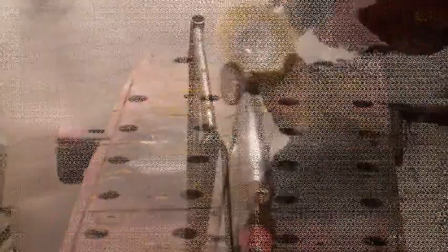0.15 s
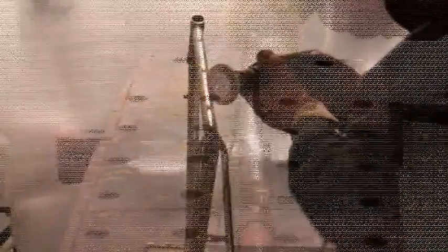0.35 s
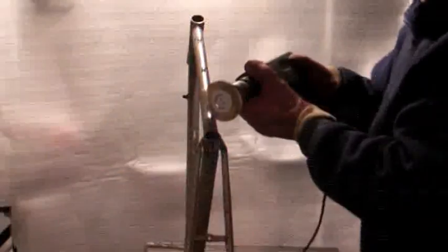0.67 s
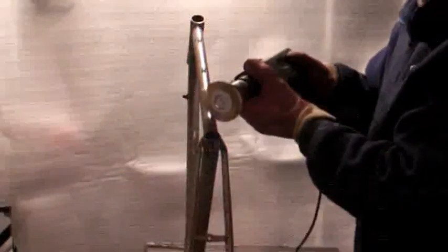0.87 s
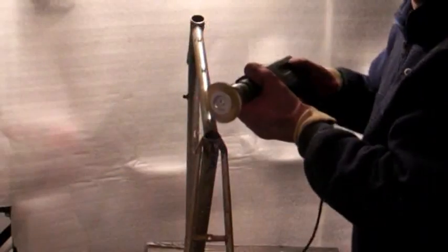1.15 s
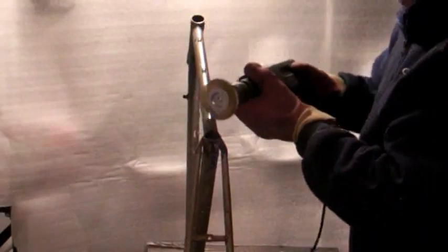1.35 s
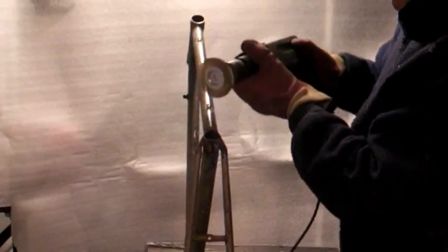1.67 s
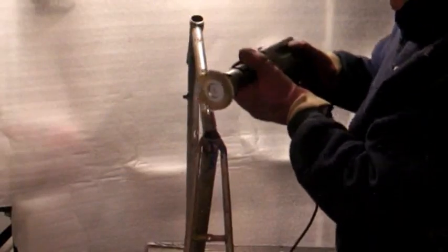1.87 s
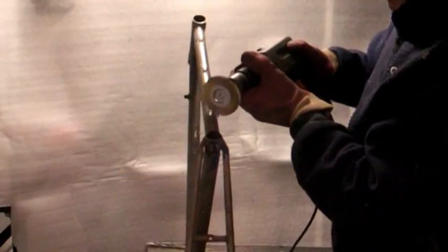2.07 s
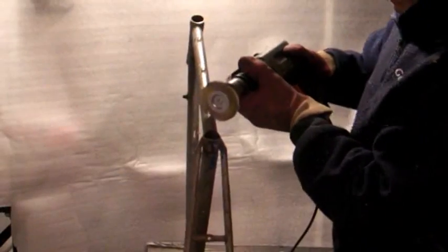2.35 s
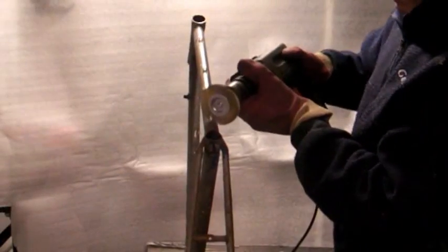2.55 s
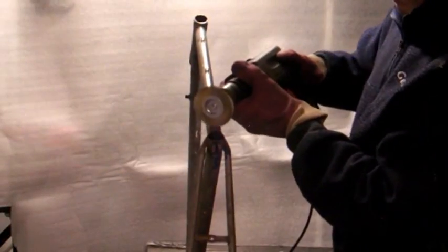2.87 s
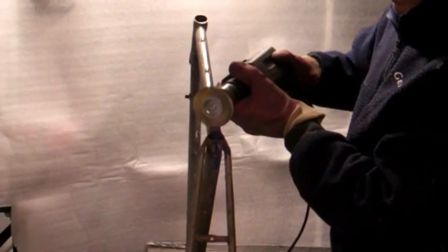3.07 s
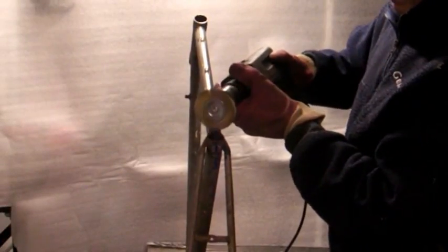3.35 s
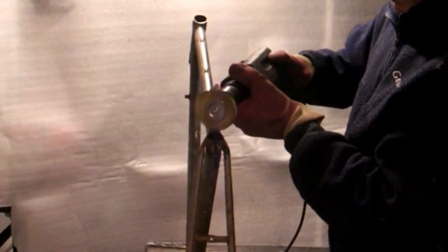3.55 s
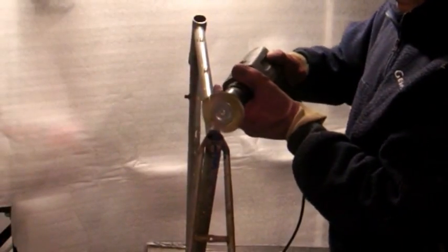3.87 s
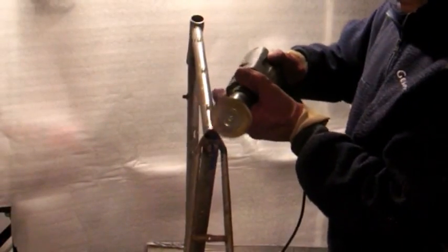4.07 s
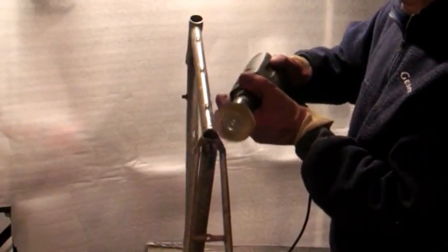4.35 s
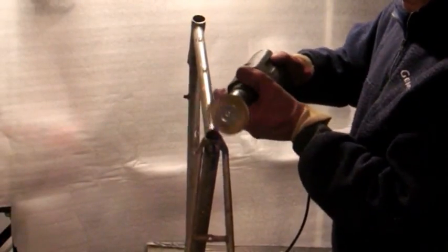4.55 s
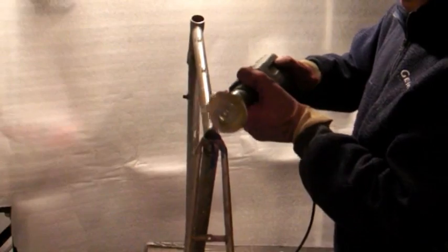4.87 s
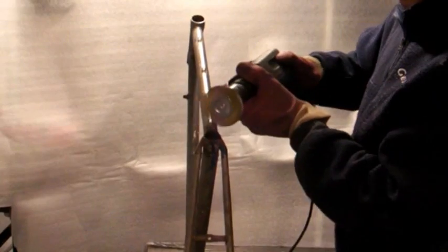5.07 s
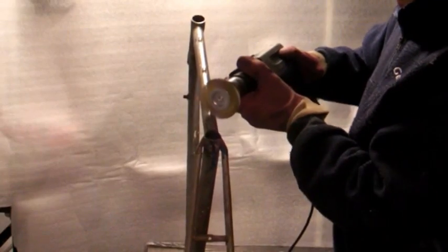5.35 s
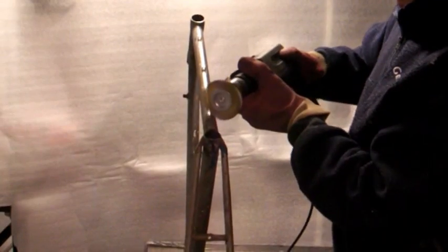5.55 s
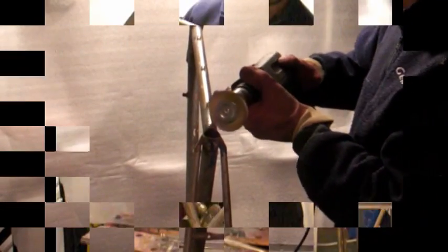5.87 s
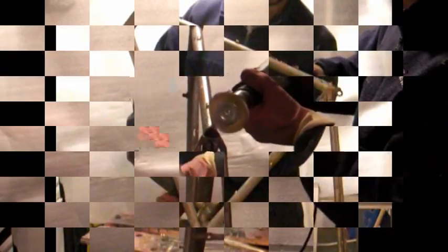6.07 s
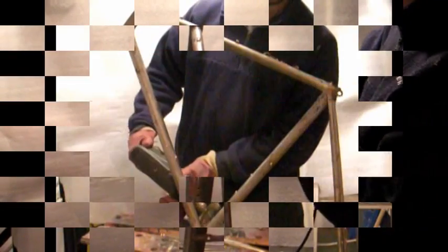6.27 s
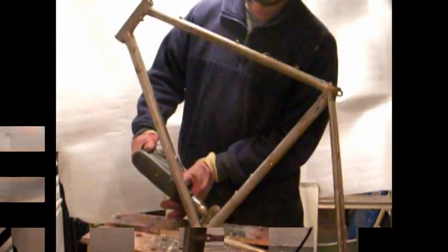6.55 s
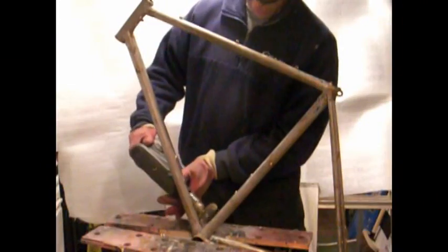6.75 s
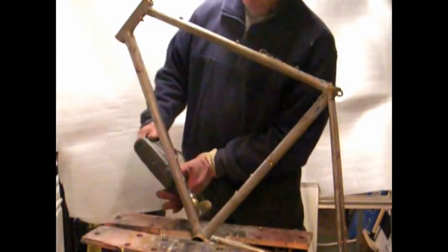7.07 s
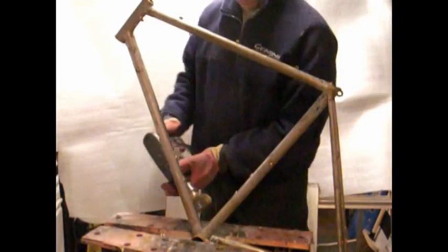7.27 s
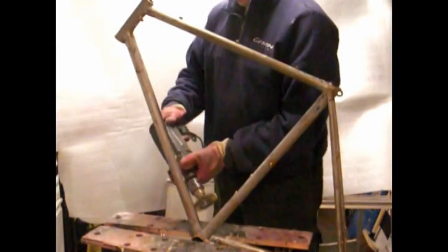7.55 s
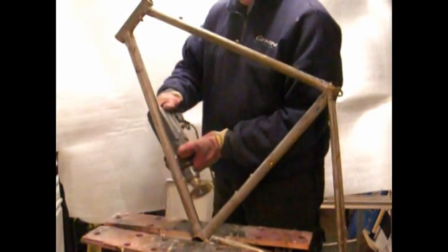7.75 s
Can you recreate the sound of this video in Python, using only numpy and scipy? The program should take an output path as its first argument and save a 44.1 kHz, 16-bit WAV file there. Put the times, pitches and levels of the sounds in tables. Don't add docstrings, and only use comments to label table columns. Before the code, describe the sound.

Harsh, bright, dense wire scratching runs almost throughout, with an electric drill's gear whine and faint chuck throb beneath. The first stretch fades within a second; the second jumps in, sags in pitch under pressure and partly recovers; the third blends in near the end. Steel tubes sing at fixed high pitches. Two close microphone ports in a garage hear each side differently.

```python
import sys
import numpy as np
from scipy import signal
from scipy.fft import rfft, irfft, next_fast_len
from scipy.io import wavfile
from scipy.ndimage import uniform_filter1d

SR = 44100
rng = np.random.default_rng(int(sys.argv[2]) if len(sys.argv) > 2 else 0)


def wav_out(sig):
    wavfile.write(sys.argv[1], SR, np.round(np.clip(np.atleast_2d(sig).T, -1, 1) * 32767).astype(np.int16))


def field_ratio(decibels):
    return 10 ** (np.asarray(decibels, dtype=float) / 20)


N = 348831
T = np.arange(N) / SR
CUT_S, BLEND_START_S, HANDOVER_S = 0.667, 5.64, 6.11
FADE_S = 1

RUMBLE_DB, BOOM_DB, ROAR_DB = [7, 5, -3], [1, 1.5, 0], [8, 1, 11]
RATTLE_DB = [0.8, 1.6, 2]
SHEEN_DB = [-0.5, 1.5, 2]
GROWL_DB = [0.5, 2, 3.5]
LOAD_COLOUR_DB = [-0.5, -3, -0.5, -1.5, -0.4, -5.5]
# centre_s, width_s, boom_db, roar_db, rattle_db
TUBE_SPOTS = [
    (0.75, 0.12, 6, 1, 0.1),
    (1.62, 0.13, 12.5, 2, 0.1),
    (2.3, 0.25, 2, -1.5, 0.47),
    (3.3, 0.13, -2, -1, 0.1),
    (4.3, 0.28, 3, 2, 0.38),
    (5.4, 0.19, 0.1, 0.5, 2.5),
    (6.85, 0.35, -4, 1, 0.1),
    (7.6, 0.24, -6.5, -5.5, 0.1),
]
# pitch_hz, level_db
RASP_SPECTRUM = [(25, -44), (130, -25), (300, -13.5), (350, -8), (480, -7), (750, 0), (2400, -1),
                 (3000, 0.1), (4200, -2.5), (6000, -0.5), (8000, 1.5), (9000, 2), (11000, 0), (15800, -1.5)]


def wires(rasp_db):
    frames, hz = N // 256 + 5, np.fft.rfftfreq(1024, 1 / SR)
    t = np.arange(frames) * 256 / SR
    colour_db = rasp_colour(hz, t)
    a, b, c, d, patches = rng.standard_normal((frames, 513, 5)).T
    patches = uniform_filter1d(patches, 10, axis=0)
    patches = evened(uniform_filter1d(patches, 16, axis=1))

    same = np.clip(read(PORT_LIKENESS, hz), 0, 1)[:, None]
    left, own = a + 1j * b, c + 1j * d
    right = same * np.exp(-1j * read(PORT_LEAD, hz))[:, None] * left + np.sqrt(1 - same ** 2) * own
    half = field_ratio(read(PORT_BALANCE, hz) / 2)[:, None]
    spectrum = np.array([left * half, right / half])
    spectrum *= field_ratio(read(RASP_SPECTRUM, hz)[:, None] + 0.63 * patches + colour_db)
    noise = signal.istft(spectrum, nperseg=1024, noverlap=768)[1][:, :N]
    scratch = evened(frame(noise))

    catches = (rng.random(N) < 400 / SR) * rng.random(N)
    bites = signal.lfilter([1], [1, -np.exp(-1 / (0.0025 * SR))], catches)
    return field_ratio(rasp_db + 0.5 * drift(3.0).real) * (1 + 0.15 * bites) * scratch


def rasp_colour(hz, t):
    free_speed = 455
    load = 10 * by_stretch([0, 1, 1], t) * (1 - shaft_speeds(t)[1] / free_speed)
    own_colours = (RUMBLE_DB, BOOM_DB, ROAR_DB, RATTLE_DB, SHEEN_DB, GROWL_DB)
    levels = [by_stretch(own, t) + slope * load for own, slope in zip(own_colours, LOAD_COLOUR_DB)]
    rumble, boom, roar, rattle, sheen, growl = levels
    spots = sum(np.outer(db, np.exp(-((t - s) / width) ** 2)) for s, width, *db in TUBE_SPOTS)
    boom, roar, rattle = [boom, roar, rattle] + spots
    growl = growl + spots[1]
    # (Hz, share)
    bands = [([(240, 0.47), (380, 0)], rumble),
             ([(240, 0.1), (400, 0.75), (500, 0.73), (600, 0.22)], boom),
             ([(500, 0.25), (600, 0.55), (1100, 0.0), (2000, 0)], roar),
             ([(2600, 0.0041), (3600, 0.78), (5000, 1), (7000, 0)], rattle),
             ([(8200, 0), (9000, 1), (9900, 0.46)], sheen),
             ([(750, 0.098), (1000, 0.74), (1400, 0)], growl),
             ([(1100, 0.083), (1280, 1.3), (1450, 0.62), (2300, 0), (3100, 0.94), (3900, 0.25)], 0.66 * load)]
    return sum(np.outer(read(band, hz), db) for band, db in bands)


# pitch_hz, lift_db
FRAME_MODES = [(625, 0.5), (715, -2), (860, -2.5), (920, 2.5), (1020, -7), (1163, 1), (1290, 0.5),
               (1364, 1.5), (1461, 2.5), (1530, -7), (1630, 3.5), (1905, 2.5), (2240, 4)]


def frame(x, width_hz=16):
    size = next_fast_len(N)
    hz = np.fft.rfftfreq(size, 1 / SR)
    lift_db = sum(db / (1 + ((hz - f) / width_hz) ** 2) for f, db in FRAME_MODES)
    ragged = evened(uniform_filter1d(rng.standard_normal(len(hz)), 140))
    lift_db += 2.7 * ragged * read([(2000, 1.0), (5000, 0.94)], hz)
    return irfft(rfft(x, size) * field_ratio(lift_db), size)[:, :N]


RASP_DB = [-12.5, -15, -13.5]
# time_s, change_db
STROKE_TURNS = [(0.9, 0), (1.2, 0.5), (1.4, -0.5), (1.74, 3.5), (1.83, -1), (2.07, -0.5), (2.3, 0.5),
                (4.03, 1), (4.53, -2), (4.75, -2.5), (5.0, -2), (5.23, -1.2), (6.93, 1), (7.17, -1.8),
                (7.35, -1.5)]


def rasp_level():
    turn_s = 0.023
    return by_stretch(RASP_DB) + sum(db * np.exp(-((T - s) / turn_s) ** 2) for s, db in STROKE_TURNS)


# start_s, length_s, level_db
PRESSES = [(-0.1, 0.31, -22.5), (0.2, 0.087, -27), (0.3, 0.37, -30), (1.72, 0.054, -29), (1.85, 0.068, -40),
           (2.08, 0.28, -40), (2.35, 0.14, -26), (2.56, 0.18, -20.5), (2.8, 0.13, -17), (2.93, 0.36, -15),
           (3.34, 0.29, -19.5), (3.64, 0.17, -26), (3.84, 0.16, -22), (4.04, 0.21, -17.5), (4.3, 0.11, -23),
           (4.44, 0.11, -19), (4.57, 0.25, -22.5), (4.84, 0.15, -20.5), (5.03, 0.34, -24),
           (5.42, 0.38, -22), (5.8, 0.21, -24), (6.03, 0.4, -28), (6.44, 0.26, -21.5), (6.72, 0.4, -26),
           (7.18, 0.22, -33), (7.4, 0.21, -25.5), (7.62, 0.4, -29.5)]
HOUSING_SWELLS = {"first": [(0.7, 1.63, -50), (2.3, 0.62, -48), (3.33, 0.67, -43), (4.22, 1.9, -43.5)],
                  "second": [(3.3, 1.56, -48), (7.4, 0.25, -35.5)], "third": [(0.9, 0.8, -46),
                  (2.22, 0.48, -34), (3.3, 0.82, -35), (4.25, 0.3, -40), (4.6, 1.2, -36),
                  (6.22, 1.13, -33.5), (7.45, 0.6, -42)], "fifth": [(-0.1, 0.42, -33.5), (2.2, 0.44, -36),
                  (2.8, 0.42, -38), (3.38, 0.22, -28), (3.75, 0.36, -32), (5.33, 0.24, -33),
                  (6.15, 0.75, -36), (7.42, 0.6, -34)], "eighth": [(2.3, 0.42, -43), (2.72, 0.24, -31),
                  (3.2, 0.8, -35), (4.07, 0.35, -31), (4.5, 0.2, -35), (5.2, 0.4, -44), (5.8, 0.3, -44),
                  (6.8, 0.17, -41), (7.25, 0.21, -37), (7.75, 0.3, -33)]}
HOUSING_REST_DB = {"first": -47.5, "second": -60, "third": -42, "fifth": -45.5, "eighth": -45}
CHUCK_SWELLS = {"lower": [(-0.1, 0.4, -37), (2.4, 0.41, -33), (3.25, 0.14, -38), (3.7, 0.34, -33),
                (4.3, 0.27, -36), (4.85, 1.28, -34.5), (5.02, 0.27, -33), (6.6, 0.5, -43)],
                "upper": [(-0.1, 0.48, -32), (2.6, 0.3, -40), (3.23, 0.2, -29), (3.65, 0.4, -34),
                (5.0, 0.37, -43)], "second": [(-0.1, 0.75, -45), (2.2, 0.6, -72), (3.6, 2.85, -64.5)],
                "third": [(2.4, 0.43, -65), (4.05, 0.46, -55), (4.7, 1.5, -64)],
                "fourth": [(-0.1, 0.88, -51.5), (6.15, 0.58, -58), (7.0, 0.35, -55.5)],
                "sixth": [(2.4, 1.03, -58.5), (4.0, 1.4, -64), (6.3, 0.85, -50), (7.2, 0.56, -53),
                (7.75, 0.3, -45)]}
BELOW_DB = [-12, -9, -6]
# start_s, length_s, level_db
WHISTLE = [
    (3.31, 0.7, -25),
    (3.65, 0.2, -26),
]


def drill():
    turns = np.cumsum(shaft_speeds()[1]) / SR
    chuck = 1 / 9.72
    edge_s, sideband_rest_db, throb_rest_db = 0.14, -54, -76.5
    whine = swells(PRESSES, -42, 0.11)
    o1, o2, o3, o5, o8 = [swells(rows, HOUSING_REST_DB[name], edge_s) for name, rows in HOUSING_SWELLS.items()]
    lower, upper = [swells(CHUCK_SWELLS[name], sideband_rest_db, edge_s) for name in ("lower", "upper")]
    lines = [(4, whine), (1, o1), (2, o2), (3, o3), (5, o5), (8, o8)]
    lines += [(4 - chuck, lower), (4 + chuck, upper)]
    lines += zip((12, 3 + chuck, 4 + 2 * chuck), np.add([o8, o3, upper], np.c_[BELOW_DB]))
    for multiple, name in [(2, "second"), (3, "third"), (4, "fourth"), (6, "sixth")]:
        lines.append((multiple * chuck, swells(CHUCK_SWELLS[name], throb_rest_db, edge_s)))
    lines.append((40, swells(WHISTLE, -70, edge_s)))
    out = np.zeros((2, N))
    for order, db in lines:
        waver = 1 + min(0.03 * order, 0.6) * drift(16 + order)
        tone = field_ratio(db) * waver * np.exp(2j * np.pi * (order * turns + rng.random()))
        out += ports(tone, order * 420, 6.0)
    return out


# time_s, speed_turns_per_s
SHAFT_SPEED = [
    [(0.0, 431.5), (0.66, 441.1)],
    [(0.68, 456.2), (2.15, 452.5), (2.87, 404.0), (3.28, 400.8), (3.485, 377.2), (3.72, 390.5),
     (4.0, 393.5), (4.4, 417.8), (4.85, 417.0), (5.4, 421.0), (6.1, 415.5)],
    [(6.11, 406.0), (6.4, 411.5), (6.68, 406.3), (7.4, 427.8), (7.76, 415.5)],
]


def shaft_speeds(t=T):
    size = round(0.12 / (t[1] - t[0]))
    smooth = []
    for rows in SHAFT_SPEED:
        time_s, speed = np.transpose(rows)
        smooth.append(uniform_filter1d(np.interp(t, time_s, speed), size))
    first, second, third = smooth
    return second, np.select([t < CUT_S, t < HANDOVER_S], [first, second], third)


def swells(rows, rest_db, edge_s):
    t = T[::64]
    start, length, db = np.transpose(rows)[:, :, None]
    inside_s = np.minimum(t - start, start + length - t)
    shape = np.sin(np.pi / 2 * np.clip(inside_s / edge_s + 0.5, 0, 1)) ** 2
    return np.interp(T, t, 20 * np.log10(field_ratio(rest_db) + (field_ratio(db) * shape).sum(0)))


# start_s, end_s, pitch_hz, level_db
TUBE_RINGS = [(0.0, 0.24, 9285.0, -33.0), (0.0, 0.44, 10729.0, -33.0), (0.0, 0.48, 12163.0, -36.0),
              (1.02, 1.26, 11507.0, -35.0), (1.69, 2.01, 9517.0, -30.0), (1.71, 1.96, 10999.0, -36.0),
              (2.02, 2.67, 11015.0, -28.0), (2.11, 2.61, 11534.0, -32.0), (2.16, 2.4, 14199.0, -34.0),
              (2.21, 2.85, 5273.0, -33.0), (2.49, 2.89, 9507.0, -35.0), (2.53, 3.22, 14201.0, -36.0),
              (2.99, 3.34, 12001.0, -36.0), (3.43, 3.73, 13232.0, -36.0), (3.66, 3.91, 8597.0, -30.0),
              (4.34, 4.63, 14196.0, -35.0), (4.67, 5.09, 14202.0, -33.0), (4.84, 5.28, 5275.0, -35.0),
              (4.85, 5.1, 9510.0, -34.0), (5.01, 5.34, 6089.0, -36.0), (5.03, 5.84, 11013.0, -30.0),
              (5.34, 5.79, 5277.0, -32.0), (5.6, 5.89, 11537.0, -32.0), (5.62, 5.89, 6097.0, -35.0),
              (6.52, 7.15, 13666.0, -36.0), (6.7, 6.97, 12381.0, -36.0), (6.99, 7.62, 8876.0, -31.0),
              (7.03, 7.91, 9074.0, -33.0), (7.2, 7.47, 9204.0, -32.0), (7.67, 7.91, 8500.0, -35.0)]
# pitch_hz, level_db
TUBE_HUMS = [(4610, -47), (5262, -45), (6090, -46), (7085, -47), (8880, -46), (9205, -45), (9510, -46),
             (11000, -45), (11530, -47), (13240, -48), (13660, -48), (14190, -44), (15065, -47)]


def tubes(rasp_db):
    out = np.zeros((2, N))
    for hz, db in TUBE_HUMS:
        swell = field_ratio(db + rasp_db - np.median(rasp_db) + 3.0 * drift(1.5).real)
        out += ports(swell * drift(16) * np.exp(2j * np.pi * hz * T), hz, 5.4)
    for start, end, hz, db in TUBE_RINGS:
        part = slice(max(round((start - 0.04) * SR), 0), min(round((end + 0.05) * SR), N))
        t = T[part]
        fuzz = 0.65 + 0.75 * drift(hz / 520, size=len(t))
        tone = fuzz * np.exp(2j * np.pi * hz * t) * signal.windows.tukey(len(t), 0.6)
        trim_db = read([(5500, 0.5), (9000, -0.6), (14200, 1.5)], hz)
        out[:, part] += ports(field_ratio(db + trim_db) * tone, hz, 12.0)
    return out


def lingering_whine():
    old_speed = shaft_speeds()[0]
    since = np.maximum(T - HANDOVER_S, 0)
    level = (since > 0) * (T < BLEND_START_S + FADE_S) * field_ratio(-27 - 16 * since)
    return ports(level * np.exp(2j * np.pi * 4 * np.cumsum(old_speed) / SR), 1660, 6.0)


def low_hum():
    return np.sqrt(2) * by_stretch([0, 0, 1]) * field_ratio(-68) * np.sin(2 * np.pi * 62 * T)


# pitch_hz, likeness (0 to 1)
PORT_LIKENESS = [(60, .76), (400, .86), (1500, .74), (2200, .38), (3800, .08), (5500, .26), (9000, .36),
                 (11700, .08), (14000, .33), (15700, .33)]
# pitch_hz, lead_rad
PORT_LEAD = [(100, 0), (1500, .17), (3300, .9), (5000, 2.3), (6000, 2.8), (9000, 3.2), (10800, 2.7),
             (12300, .2), (15000, 0)]
# pitch_hz, level_db
PORT_BALANCE = [(60, -3), (180, -4.5), (550, -3), (1650, -3), (4970, -0.5), (15000, -0.5)]


def ports(tone, hz, rate_hz):
    same = np.clip(read(PORT_LIKENESS, hz) + 0.22, 0, 0.98)
    lead = 0.45 * read(PORT_LEAD, hz)
    right = same * np.exp(-1j * lead) + np.sqrt(1 - same ** 2) * drift(rate_hz, size=len(tone))
    half = field_ratio(read(PORT_BALANCE, hz) / 2)
    return np.sqrt(2) * np.array([half * tone.real, (tone * right).real / half])


def evened(x):
    return x / np.sqrt(np.mean(abs(x) ** 2) + 1e-20)


def read(points, hz):
    f, value = np.transpose(points)
    return np.interp(np.log(hz + 1), np.log(f + 1), value)


def drift(rate_hz, size=N):
    steps = rng.standard_normal((size // 64 + 2, 2)) @ [1, 1j]
    hz = np.fft.fftfreq(len(steps), 64 / SR)
    slow = evened(np.fft.ifft(np.fft.fft(steps) / (1 + (hz / rate_hz) ** 2)))
    return np.interp(np.arange(size) / 64, np.arange(len(slow)), slow)


def by_stretch(values, t=T):
    first, second, third = values
    times = [CUT_S, CUT_S + 1e-3, BLEND_START_S, BLEND_START_S + FADE_S]
    return np.interp(t, times, [first, second, second, third])


def fader():
    blend = np.clip((T - BLEND_START_S) / FADE_S, 0, 1)
    first = np.maximum(CUT_S - T, 0) / FADE_S + 0.03
    later = np.clip((T - CUT_S) / 0.012, 0.01, 1)
    return np.where(T < CUT_S, first, later) * np.hypot(blend, 1 - blend)


def scene():
    rasp_db = rasp_level()
    return wires(rasp_db) + drill() + tubes(rasp_db) + lingering_whine() + low_hum()


def roll_off(x):
    return signal.sosfilt(signal.butter(12, 17090, fs=SR, output="sos"), x)


def record(dry):
    knee_db, duck, duck_s = -12.5, 0.62, 0.033
    sensed = signal.lfilter([0.8, 0.8], 1, dry)
    power_db = 10 * np.log10(uniform_filter1d((sensed ** 2).mean(0), round(duck_s * SR)) + 1e-9)
    edited = dry * fader() / field_ratio(duck * np.maximum(power_db - knee_db, 0))
    size = next_fast_len(N)
    hz = np.fft.rfftfreq(size, 1 / SR)
    notch = 1 - 0.85 * np.exp(-((hz - 7850) / 33) ** 2)
    edge = np.clip((15760 - hz) / 60, 0, 1)
    mix = irfft(rfft(edited, size) * notch * edge, size)[:, :N]
    return roll_off(mix)


dry = scene()
out = record(dry)
wav_out(out)
```